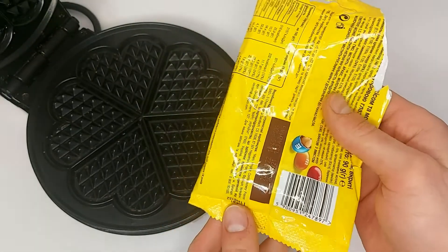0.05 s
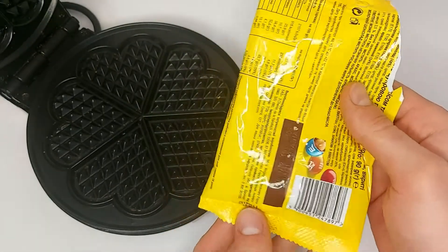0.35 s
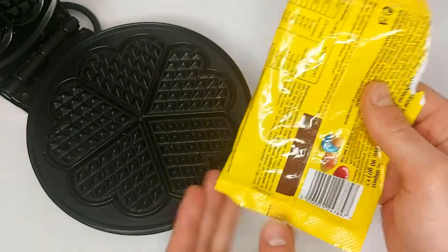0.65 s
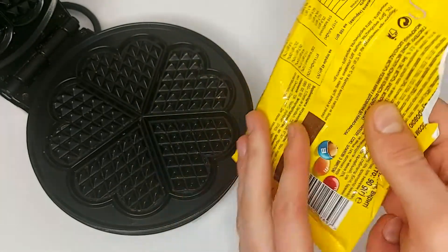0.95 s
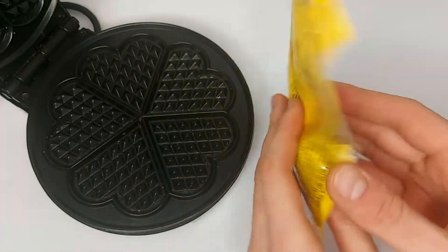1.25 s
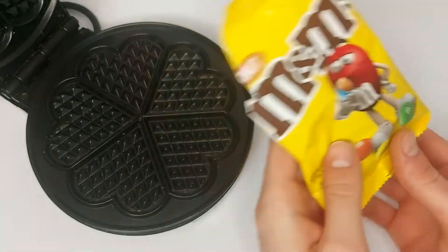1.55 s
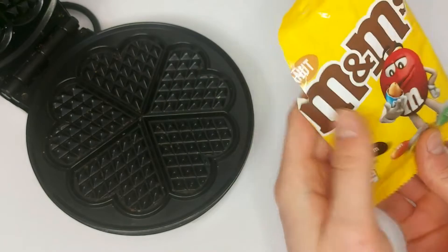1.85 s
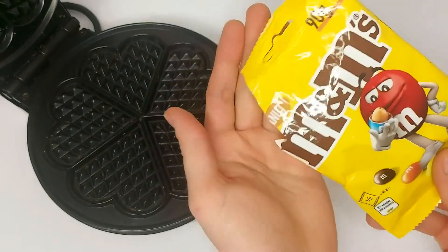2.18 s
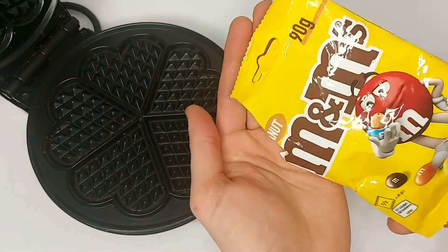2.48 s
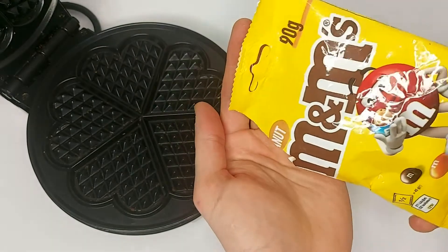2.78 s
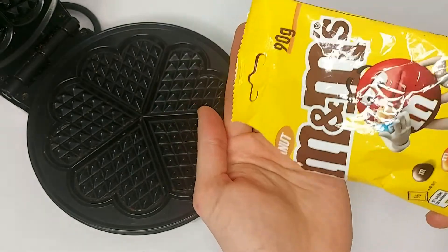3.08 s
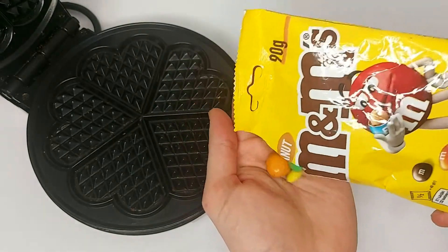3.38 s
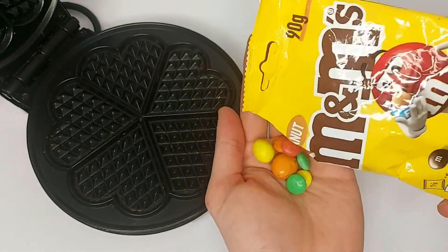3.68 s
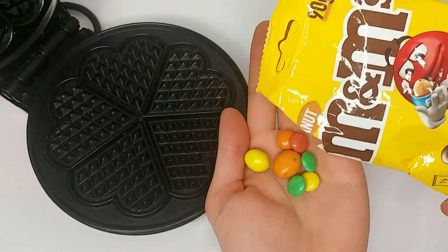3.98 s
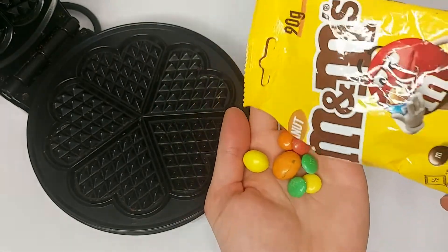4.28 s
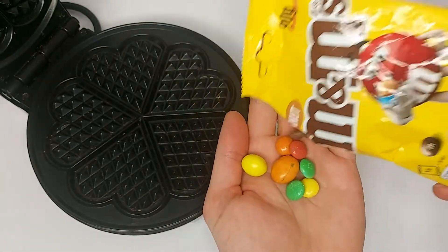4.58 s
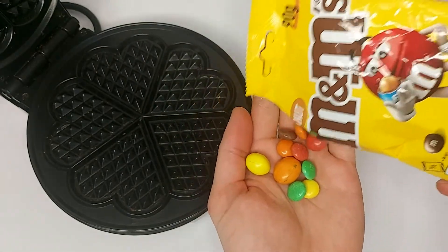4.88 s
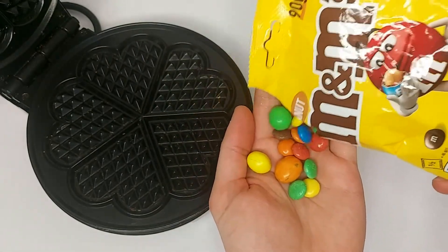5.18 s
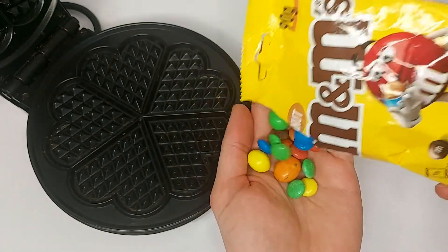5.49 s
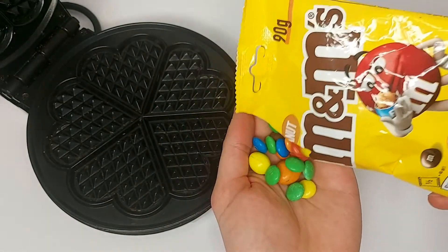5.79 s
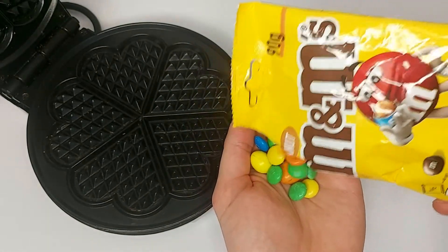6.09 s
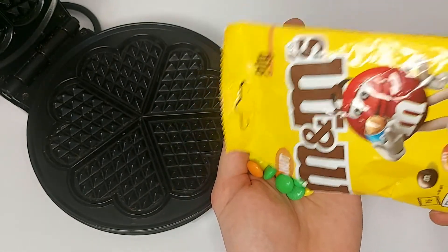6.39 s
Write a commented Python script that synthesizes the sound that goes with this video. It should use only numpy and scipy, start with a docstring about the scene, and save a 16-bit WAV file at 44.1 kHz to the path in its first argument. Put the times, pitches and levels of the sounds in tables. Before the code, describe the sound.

Close snapping and rustling of a plastic bag, followed by small candies clicking brightly into a hand, with a quiet motor humming underneath.

```python
"""Candy poured from a bag

Close on a stereo microphone above a kitchen worktop, a plastic bag is turned over, then shaken so that
sugar-coated candies slide into a palm. Creases in the film snap and rustle; candies knock dully in the
bag, click brightly in the hand and clack once near the end. A low appliance motor slows and picks up."""
import sys
import numpy as np
from scipy import signal
from scipy.fft import rfft, irfft, next_fast_len
from scipy.io import wavfile

SR = 44100
rng = np.random.default_rng(int(sys.argv[2]) if len(sys.argv) > 2 else 0)


def output_pcm(signal):
    """Save a mono or channel-first signal as 16-bit PCM at the path in sys.argv[1].

    Samples are clipped to [-1, 1] before scaling.
    """
    pcm = np.clip(np.atleast_2d(signal).T, -1, 1) * 32767
    wavfile.write(sys.argv[1], SR, np.round(pcm).astype(np.int16))


N = 293265
TIME = np.arange(N) / SR
LEAD_S = .005  # a faint noise swells this long before each snap or click, softening its attack

# Creases snapping. Each row: time in seconds, level in dB, brightness in dB per zone above the crack,
# hollow body in dB.
SNAPS = [(0.0298, -19.5, -4.5, 6), (0.0456, -20, -6, -1), (0.055, -21.5, -9, 6.5), (0.1038, -18.5, 0.5, -1),
         (0.1974, -27, -7.5, -1), (0.3047, -31, -3, 0), (0.3155, -24.5, -3, -5), (0.3243, -15.5, 3.5, -4),
         (0.3317, -11.5, 3, 3.5), (0.3752, -13.5, -3, -15.5), (0.4838, -16.5, -13, -7.5),
         (0.5193, -28, 2, 7), (0.534, -19.5, 1.5, 1.5), (0.5756, -8.5, 2.5, -2), (0.609, -17.5, 7, 4.5),
         (0.8519, -22, 2, 3.5), (0.9077, -16.5, -1.5, 4), (1.0217, -15, 4, -1.5), (1.122, -18.5, -8, -10.5),
         (1.1673, -7, 3, -5.5), (1.1856, -13, 4, -4), (1.219, -10, 5.5, 5), (1.283, -12.5, -8, -1.5),
         (1.3115, -23, 2, -8.5), (1.3189, -7, 3, -2.5), (1.3324, -16, 5, -1), (1.3484, -13, 0, -4.5),
         (1.365, -4, -1.5, -4.5), (1.3735, -29, 1, 0.5), (1.4497, -23, 1, 8), (1.4782, -16.5, -3, -7),
         (1.5991, -14, -2, -5.5), (1.6228, -10.5, -4, -7.5), (1.6379, -11, -1, -5), (1.6427, -13, 2.5, -6),
         (1.6745, -9.5, 0, -1), (1.7163, -16.5, 3, 1), (1.751, -9, 6, -6.5), (1.8157, -7, 3, -5),
         (1.829, -20.5, 1, 2.5), (1.8947, -18, -6, -2), (1.9471, -15.5, -1, -10), (1.966, -21.5, -5, 2),
         (2.0675, -16.5, -1.5, 3), (2.171, -38.5, 0.5, -8), (2.2758, -20.5, -0.5, -4.5),
         (2.3328, -17.5, -1.5, 1), (2.386, -34.5, 4.5, -7), (2.3939, -19, -6.5, 3.5),
         (2.4669, -32, -14, 10.5), (2.492, -31.5, 1.5, -6), (2.498, -25, -1, -3.5), (2.577, -32.5, 0.5, -6),
         (2.5932, -32, 2.5, -3), (2.6404, -24, 0, -0.5), (2.6622, -30.5, 2.5, -8.5),
         (2.6954, -31.5, 2.5, 2.5), (2.7652, -39, 5, 14), (2.8065, -29, 1, 0), (2.9134, -26.5, 5, 10),
         (2.9398, -15, -10, 1), (2.9566, -13.5, -8, 0), (2.9691, -9, -4, -6.5), (3.014, -7, -6, -10),
         (3.0296, -15, -3, 4), (3.0583, -15.5, 3, 3), (3.1323, -33, 5.5, 5), (3.1678, -22, 3.5, 7.5),
         (4.0168, -58, 2.5, 5), (4.2548, -61.5, 4, 14), (4.3952, -24, -5.5, -11), (4.401, -21.5, -16, -1),
         (4.5132, -16.5, -15, -4), (4.6452, -30, 1.5, 6), (4.6543, -25.5, -10, 10), (4.7986, -23.5, -10, 5),
         (4.8415, -24, 3, 2.5), (5.0302, -28, 2, 10.5), (5.0529, -20, -6, -0.5), (5.1418, -18, -4.5, -4),
         (5.203, -22.5, 6.5, 4), (5.3554, -31, -5, 4), (6.2259, -10, -1, -1), (6.5545, -38.5, -10, -5)]
# The film's four zones: body, crack, edge and fizz. Each row: low and high limit in Hz.
ZONES_HZ = [(230, 1500), (1500, 5000), (5000, 9000), (9000, 16800)]
# Low rumble of motor and bag. Each row: frequency in Hz, relative level in dB.
RUMBLE_COLOUR = [(25, -26), (45, -8), (60, -5), (85, -4.5), (120, -2), (170, -6), (230, -9.5), (320, -20.5),
                 (600, -28.5), (1500, -61), (4000, -82.5)]


def from_db(db):
    """Decibels to gain."""
    return 10 ** (np.asarray(db) / 20)


def rms_one(x):
    """Scale to rms 1."""
    return x / np.sqrt(np.mean(x ** 2) + 1e-20)


def unit_energy(x):
    """Scale each stereo grain to a mean energy of 1 per channel."""
    return x / np.sqrt(np.sum(x ** 2, axis=(-2, -1), keepdims=True) / 2 + 1e-20)


def in_time(points):
    """Read a curve at every sample."""
    return np.interp(TIME, *np.transpose(points))


def at_hz(points, hz):
    """Read a spectrum on a log-frequency axis."""
    f, value = np.transpose(points)
    return np.interp(np.log(hz + 1e-9), np.log(f), value)


def band(x, low_hz, high_hz):
    """Causal band-pass."""
    sos = signal.butter(3, [low_hz, min(high_hz, .48 * SR)], "band", fs=SR, output="sos")
    return signal.sosfilt(sos, x + 1e-18)


def balanced(grains, zones, levels_db):
    """Give each grain its own energy in each frequency zone."""
    return sum(unit_energy(band(grains, *zone)) * from_db(db)[:, None, None]
               for zone, db in zip(zones, levels_db))


def stereo_noise(spectrum, alike, lag_ms, count, size):
    """Rows of coloured noise pairs, partly alike, the right side late by lag_ms."""
    hz = np.fft.rfftfreq(size, 1 / SR)
    common = np.sqrt(alike) * rng.standard_normal((count, 1, size))
    apart = np.sqrt(1 - alike) * rng.standard_normal((count, 2, size))
    delay_s = np.reshape(lag_ms, (-1, 1, 1)) * np.array([[0], [1]]) / 1000
    coloured = rfft(common + apart) * from_db(at_hz(spectrum, hz))
    return irfft(coloured * np.exp(-2j * np.pi * hz * delay_s), size)


def steady_noise(spectrum, alike):
    """Coloured stereo noise for the whole scene, rms 1."""
    return rms_one(stereo_noise(spectrum, alike, 0, count=1, size=next_fast_len(N))[0, :, :N])


def stereo_time(size, lag_s):
    """Seconds since a sound reached each side of the microphone, the right late by lag_s."""
    return np.maximum(np.arange(size) / SR - np.array([[0], [lag_s]]), 0)


def place(times, grains, pan_db):
    """Lay stereo grains on the time line; positive pan is to the left."""
    out = np.zeros((2, N))
    for s, grain, pan in zip(times, grains, pan_db):
        at = max(0, round(s * SR))
        out[:, at:at + grain.shape[-1]] += (grain * from_db([[pan / 2], [-pan / 2]]))[:, :N - at]
    return out


def bumps(rows, cycles, lag_s):
    """Blows that swell within a cycle and die after a few."""
    times, level_db, hz = np.transpose(rows)
    turns = hz[:, None, None] * stereo_time(SR // 4, lag_s)
    grains = 2 * np.sin(2 * np.pi * turns) * (1 - np.exp(-2 * turns)) * np.exp(-turns / cycles)
    return place(times, grains * from_db(level_db)[:, None, None], np.zeros(len(times)))


def room_tone():
    """The still air of the kitchen, faint and wide."""
    # Each row: frequency in Hz, relative level in dB.
    air_colour = [(100, 0), (300, -8.5), (600, -10.5), (1000, -17.5), (2000, -26), (6000, -29.5),
                  (10000, -27.5), (16000, -29)]
    return from_db(-73.5) * steady_noise(air_colour, alike=.3)


def kitchen(x, near_db, near_s, tail_db):
    """Add quick scatter from the worktop and hands, then a tail that dies sooner in the treble."""
    # Each row: frequency in Hz, seconds for the room to fall 60 dB.
    room_t60 = [(300, 0.32), (800, 0.43), (2000, 0.45), (5500, 0.33), (9000, 0.33), (15000, 0.12)]
    t = np.arange(SR // 2) / SR
    edges_hz = np.geomspace(150, 18000, 10)
    tail = 0
    for low, high in zip(edges_hz, edges_hz[1:]):
        hz = np.sqrt(low * high)
        alike = 1 / (1 + (hz / 600) ** 2)  # long waves reach both sides alike
        common = np.sqrt(alike) * rng.standard_normal(len(t))
        apart = np.sqrt(1 - alike) * rng.standard_normal((2, len(t)))
        tail = tail + band(common + apart, low, high) * from_db(-60 * t / at_hz(room_t60, hz))
    near = tail * np.exp(-t / near_s) * (t > .0008)
    response = from_db(near_db) * unit_energy(near) + from_db(tail_db) * unit_energy(tail * (t > .006))
    return x + signal.fftconvolve(x, response, axes=1)[:, :N]


def drone_gain(swell_db, release_db_per_s):
    """Each drone of the motor housing swells ever more slowly, holds, and dies quickly."""
    # Each row: start, full strength and stop in seconds, level in dB.
    drones = [(0.51, 0.584, 0.655, -54), (1.55, 2.5, 5.6, -50)]
    gain = 0
    for start, full, stop, db in drones:
        rise_left = np.maximum((full - TIME) / (full - start), 0)
        release_db = release_db_per_s * np.maximum(TIME - stop, 0)
        gain = gain + from_db(db - swell_db * rise_left ** 2 - release_db)
    return gain


def motor(wander_rad, shake_rumble_db, drone_rumble_db):
    """The motor shakes its housing unsteadily and at times makes it drone; a soft rumble follows both."""
    # Motor speed. Each row: time in seconds, turns per second.
    speed = [(0, 43), (0.65, 52), (0.85, 51), (1.3, 55), (1.7, 51.3), (2.2, 48.7), (2.8, 50.3), (3.5, 49.9),
             (4.3, 48.2), (4.8, 49.5), (5.2, 48.3), (5.55, 48.8), (5.8, 52.5), (6.1, 52), (6.65, 58)]
    # How hard the housing shakes. Each row: time in seconds, level in dB.
    shake_levels = [(0, -72), (.2, -68), (.33, -73), (.47, -78), (.66, -48.5), (.8, -48.5), (1.22, -49),
                    (1.42, -69), (1.65, -56.5), (2.55, -51.5), (4.1, -60.5), (4.7, -59), (5.1, -66),
                    (5.5, -64), (5.72, -60.5), (5.83, -54.5), (5.98, -64), (6.15, -55.5), (6.65, -59.5)]
    # Harmonics of the shake and of the drone. Each row: multiple of the speed, relative level in dB.
    shake_orders = [(1, -2), (2, -3), (3, -11.5)]
    drone_orders = [(2, -11.5), (3, -0.5), (4, -14.5), (5, -17.5), (6, -26.5), (7, -26), (8, -31.5),
                    (9, -35)]
    # Pace of the shake's unsteadiness. Each row: rate in Hz, relative level in dB.
    wander_spectrum = [(1, 0), (6, 0), (15, -25), (60, -80)]
    shake = from_db(in_time(shake_levels))
    drone = drone_gain(swell_db=14, release_db_per_s=150)
    angle = 2 * np.pi * np.cumsum(in_time(speed)) / SR
    wander = wander_rad * steady_noise(wander_spectrum, alike=0)
    phases = rng.uniform(0, 2 * np.pi, size=12)
    shaking = sum(from_db(db) * np.sin(k * angle + phases[k] + wander) for k, db in shake_orders)
    droning = sum(from_db(db) * np.cos(k * angle + phases[k]) for k, db in drone_orders)
    rumble_gain = np.hypot(shake * from_db(shake_rumble_db), drone * from_db(drone_rumble_db))
    rumble = rumble_gain * steady_noise(RUMBLE_COLOUR, alike=.5)
    return np.sqrt(2) * (shake * shaking + drone * droning) + rumble


def low_thumps():
    """Soft low thumps, a few cycles each."""
    # Each row: start in seconds, level in dB, pitch in Hz.
    thumps = [(0.572, -38, 320), (0.612, -44, 140), (0.655, -36.5, 100), (0.793, -38, 75),
              (1.008, -45.5, 270), (1.04, -46, 62), (1.213, -43, 210), (5.76, -56, 110), (5.81, -45, 58)]
    return bumps(thumps, cycles=2.5, lag_s=.0002)


def bag_flexing(body_gain):
    """The whole bag moves air as it is squeezed."""
    return body_gain * steady_noise(RUMBLE_COLOUR, alike=.46)


def candy_knocks():
    """Dull candy knocks in the bag, and one hard, bright clack near the end."""
    # Each row: start in seconds, level in dB, pitch in Hz.
    knocks = [(0.166, -49, 670), (0.213, -41.5, 1110), (0.422, -43.5, 625), (0.907, -37.5, 670),
              (1.448, -32.5, 904), (1.477, -32.5, 1330), (1.53, -40.5, 920), (1.539, -37, 1010),
              (1.894, -31.5, 1070), (1.945, -40, 1090), (1.964, -38, 1045), (2.332, -30.5, 1370),
              (2.793, -35, 956), (2.97, -33.5, 695), (3.149, -34, 875), (4.797, -39.5, 1166),
              (5.052, -36, 910), (6.226, -21.5, 3470)]
    return bumps(knocks, cycles=1.51, lag_s=.00022)


def film_zones(s, bright_db, body_db):
    """Body, crack, edge and fizz in dB at time s: how the bag is held colours its film."""
    # Flat, tipped with its mouth open, then resting on the pile, which damps its body.
    # Each row: start in seconds, then body, crack, edge and fizz in dB.
    holds = [(0, -5.5, 0, -3.5, -14), (2.15, -2, 0.5, 1.5, -2.5), (5.68, -18, -5, -1, -10)]
    holds = np.array(holds)
    held_db = holds[np.sum(holds[1:, 0] <= s), 1:]
    return held_db + [body_db, 0, bright_db, 2 * bright_db]


def handling(attack_s, sag_db_per_s, release_db_per_s, settle_db, settle_db_per_s):
    """Rustle gain per zone: squeezes swell, sag and die; after each snap the creases nearby settle."""
    # Fingers squeeze or shift the bag.
    # Each row: start and length in seconds, level in dB, brightness in dB per zone above the crack.
    squeezes = [(0.053, .03, -65, -1), (0.201, 0.041, -68, -5), (0.321, 0.046, -59, 3.5),
                (0.499, .04, -56, 1), (0.552, 0.059, -48, 3.5), (0.869, 0.075, -53.5, 1.5),
                (0.93, 0.084, -54, 1.5), (1.105, .04, -57.5, 0.5), (1.163, 0.066, -43, 1.5),
                (1.25, .04, -46.5, 3), (1.286, 0.051, -38.5, 0.5), (1.443, 0.16, -60.5, 0.5),
                (1.597, .08, -47.5, -6), (1.73, 0.13, -53, 2.5), (1.883, .1, -58, -1),
                (2.074, 0.033, -65, -1), (2.189, .08, -67.5, -0.5), (2.273, 0.16, -58, -2.5),
                (2.468, 0.075, -63, -3), (2.585, 0.12, -61.5, -0.5), (2.764, 0.059, -60.5, -0.5),
                (2.851, .06, -67.5, 0), (2.913, 0.17, -47, 0), (3.097, .04, -53, 4.5),
                (3.149, 0.039, -47, 1), (3.231, 0.093, -53, -3), (3.325, 0.098, -55, 2.5),
                (3.443, 0.063, -65, 1), (3.566, 0.12, -75.5, 4), (4.231, 0.084, -85.5, 0),
                (4.406, 0.026, -57.5, -6), (4.501, 0.028, -59.5, 2), (4.638, 0.043, -53, 0.5),
                (4.713, 0.18, -58.5, -0.5), (4.95, .07, -58, 1), (5.026, 0.13, -59.5, -2.5),
                (5.183, 0.073, -53, 1.5), (5.349, .17, -58, 0), (5.54, 0.067, -55, 5.5),
                (5.76, 0.13, -56, -3), (5.973, 0.083, -59, -1), (6.115, .07, -56.5, 3),
                (6.23, 0.079, -58, 3), (6.549, .04, -64.5, -2.5)]
    duller_db, fuller_db = -1.5, 2  # the rustle is darker than the snaps
    t = TIME[::40]
    power = 0
    for start, length, db, bright_db in squeezes:
        held_s = np.maximum(t - start, 0)
        fall_db = sag_db_per_s * held_s + release_db_per_s * np.maximum(held_s - length, 0)
        gain = np.clip(1 + (t - start) / attack_s, 0, 1) * from_db(db - fall_db)
        colour = from_db(film_zones(start, duller_db + bright_db, fuller_db))
        power = power + np.outer(colour, gain) ** 2
    for s, db, bright_db, body_db in SNAPS:
        gain = (t > s) * from_db(db + settle_db - settle_db_per_s * abs(t - s))
        colour = from_db(film_zones(s, duller_db + bright_db, fuller_db + body_db))
        power = power + np.outer(colour, gain) ** 2
    return [np.interp(TIME, t, np.sqrt(zone)) for zone in power]


def buckles(count, decay_s, flutter_db, flutter_s, lead_db):
    """After a faint swell of noise, a crease flips in a millisecond or two and the film flutters out."""
    # Each row: frequency in Hz, relative level in dB.
    film_colour = [(220, -11.5), (350, 1.5), (490, -13), (620, 4), (820, 0.5), (1150, 0), (1550, -9.5),
                   (2100, 0.5), (3000, -1.5), (3900, -6.5), (5500, -8.5), (7400, -5.5), (9500, -20),
                   (13000, -12), (16000, -25.5)]
    t = np.arange(1536) / SR - LEAD_S
    lag_ms = rng.normal(.22, .053, count)
    noise = stereo_noise(film_colour, alike=.87, lag_ms=lag_ms, count=count, size=len(t))
    lead_in = from_db(lead_db) * (1 + t / LEAD_S)
    flip = np.exp(-abs(t) / decay_s) + from_db(flutter_db) * np.exp(-abs(t) / flutter_s)
    return noise * np.where(t < 0, lead_in, flip)


def rustle(gains, per_s, spread_db):
    """Countless tiny creases flip at random, most weak and a few strong."""
    creases = buckles(count=40, decay_s=.00064, flutter_db=-12, flutter_s=.007, lead_db=-13)
    at = np.flatnonzero(rng.random(N) < per_s / SR)
    sizes = from_db(spread_db * np.minimum(rng.exponential(1, len(at)), 3))
    sizes *= rng.choice([-1, 1], len(at))
    grains = creases[rng.integers(0, len(creases), len(at))] * sizes[:, None, None]
    crackle = place(at / SR, grains, pan_db=rng.normal(0, 2.6, len(at)))
    return sum(rms_one(band(crackle, *zone)) * gain for zone, gain in zip(ZONES_HZ, gains))


def snaps(side_db, scatter_db):
    """Single creases flip, duller or brighter, thin or hollow, scattered over the bag."""
    times = np.array(SNAPS)[:, 0]
    bursts = buckles(count=len(times), decay_s=.0017, flutter_db=-16.5, flutter_s=.0047, lead_db=-13)
    levels_db = [db + film_zones(s, bright_db, body_db) for s, db, bright_db, body_db in SNAPS]
    grains = balanced(bursts, ZONES_HZ, np.transpose(levels_db))
    return place(times - LEAD_S, grains, rng.normal(side_db, scatter_db, len(times)))


def candy_clicks(detune, scatter_db, lag_s, upper_db, pile_db_per_s):
    """Hard shells meet and ring, brighter as the pile grows; each candy grazes the film as it goes."""
    # Contacts in the palm. Each row: start in seconds, level in dB, left over right in dB.
    contacts = [(3.227, -30, 15), (3.272, -29.5, 11), (3.3032, -22.5, 3), (3.3193, -19.5, 5),
                (3.3355, -15, 7), (3.342, -15.5, 0), (3.3586, -14.5, 8), (3.4094, -22.5, 6),
                (3.428, -21, 5), (3.4462, -24, 2), (3.5715, -18.5, 5.5), (3.619, -23.5, -3),
                (3.6458, -24.5, 1.5), (3.6727, -11, 1.5), (3.728, -30, 1.5), (4.5008, -32.5, 6),
                (4.5212, -30, 15), (4.6123, -18.5, 7), (4.645, -16, 3), (4.659, -18.5, 2),
                (4.7247, -19.5, 3.5), (4.7747, -31, 10), (4.829, -21.5, 4), (4.84, -20.5, 3),
                (4.8624, -21, 4), (4.9507, -28.5, 1), (5.2005, -13, 4), (5.2258, -21, 3), (5.2566, -22, 2),
                (5.275, -17, 4), (5.3105, -27, 5), (5.3612, -19.5, 4), (5.383, -21, 1), (5.4102, -23, 2),
                (5.4182, -8.5, 2.5), (5.4477, -20, -1), (5.4749, -24, 1), (5.4907, -19, 4),
                (5.4932, -17, 5), (5.5174, -12, -1), (5.5443, -10, 5), (5.559, -16, -2), (5.567, -13, 0),
                (5.5839, -8, 4), (5.59, -14.5, -1), (5.6083, -17, 0), (5.6313, -25, 1), (5.6596, -28, 3),
                (5.7333, -21, 2), (5.754, -17, 4.5), (5.76, -22, 1), (5.7966, -14, 6), (5.8093, -16.5, -5),
                (5.813, -19, 6), (5.8459, -22, 1), (5.872, -22, 1), (5.9847, -28.5, 3),
                (6.0403, -31.5, 5.5), (6.1019, -16.5, 4.5), (6.1091, -19.5, 1), (6.1216, -17, 5),
                (6.1563, -20.5, 9), (6.165, -27, -3), (6.187, -20.5, 2), (6.2854, -22, 6), (6.2948, -25, 4),
                (6.307, -21, -7.5), (6.3335, -25, 0)]
    # Ring of a sugar shell. Each row: frequency in Hz, relative level in dB, seconds to fall 60 dB.
    shell_modes = [(3670, -4.5, .003), (5630, -8, 0.0016), (6180, -6.5, 0.0029), (6500, -15.5, 0.0026),
                   (7370, -1.5, 0.0027), (7980, -11.5, 0.0046), (9270, -10, 0.0024), (9470, -4.5, 0.0018),
                   (11070, -1.5, 0.0073), (11450, -3, 0.0031), (12950, 0, 0.0037), (14500, 4.5, 0.0024)]
    times, lower_db, pan_db = np.transpose(contacts)
    count = len(times)
    top_db = lower_db + upper_db + pile_db_per_s * (times - times[0])
    t = stereo_time(600, lag_s)
    rings = 0
    for hz, db, t60 in shell_modes:
        pitch = hz * (1 + detune * rng.standard_normal((count, 1, 1)))  # no two candies ring alike
        strength_db = db + rng.normal(0, scatter_db, (count, 2, 1))
        phase = rng.uniform(0, 2 * np.pi, (count, 1, 1)) + rng.normal(0, .13, (count, 2, 1))
        rings = rings + from_db(strength_db - 60 * t / t60) * np.sin(2 * np.pi * pitch * t + phase)
    shells = balanced(rings, [(4700, 9000), ZONES_HZ[-1]], [lower_db, top_db])
    grazes = buckles(count, decay_s=.00086, flutter_db=-18.5, flutter_s=.0058, lead_db=-11.5)
    grazes = balanced(grazes, [(500, 3000), (5000, 12800)], [lower_db - 31, top_db - 10])
    return place(times, shells, pan_db) + place(times - LEAD_S, grazes, pan_db)


def scene():
    """Bag and candies close to the microphone, the motor and other low sounds a little to the right."""
    gains = handling(attack_s=.012, sag_db_per_s=17, release_db_per_s=209,
                     settle_db=-46, settle_db_per_s=291.5)
    film = from_db(.5) * snaps(side_db=.05, scatter_db=1.8) + rustle(gains, per_s=520, spread_db=5)
    flexing = from_db(-9.5) * bag_flexing(gains[0])
    clicks = candy_clicks(detune=.05, scatter_db=5, lag_s=.00015, upper_db=-4, pile_db_per_s=1.5)
    candies = candy_knocks() + from_db(.5) * clicks
    hum = motor(wander_rad=.48, shake_rumble_db=-8, drone_rumble_db=-13)
    low = (hum + flexing + from_db(-4.5) * low_thumps()) * from_db([[-1.2], [1.1]])
    air = room_tone()
    return kitchen(film + candies, near_db=-9, near_s=.0059, tail_db=-11.5) + low + air


def record(dry):
    """The treble is cut steeply above 16.2 kHz."""
    return signal.sosfilt(signal.ellip(10, .1, 80, 16200, fs=SR, output="sos"), dry)


dry = scene()
out = record(dry)
output_pcm(out)
```